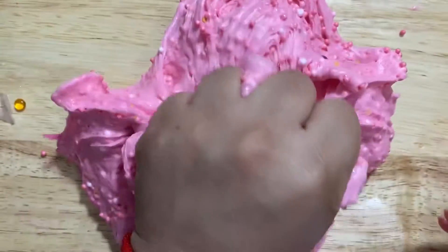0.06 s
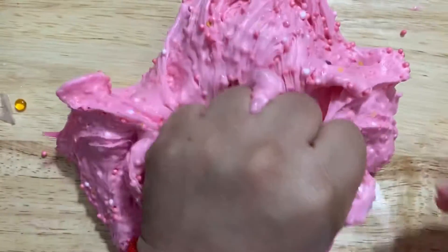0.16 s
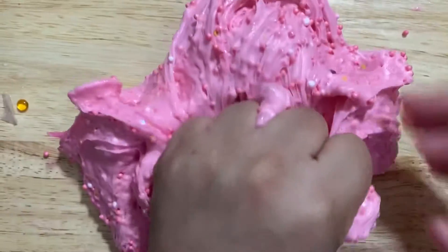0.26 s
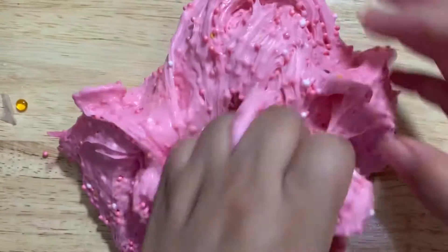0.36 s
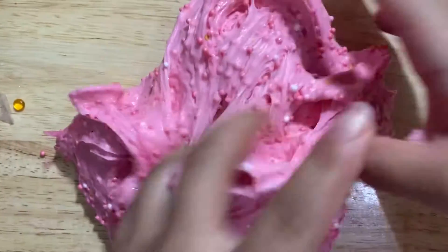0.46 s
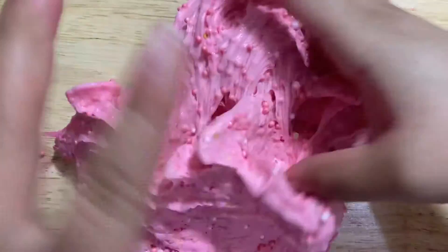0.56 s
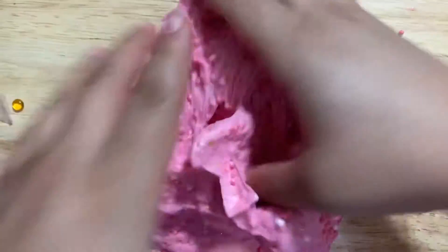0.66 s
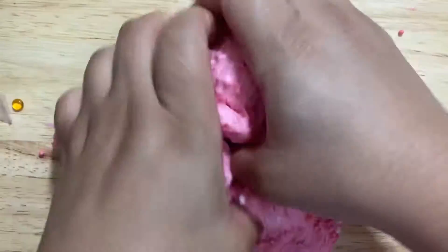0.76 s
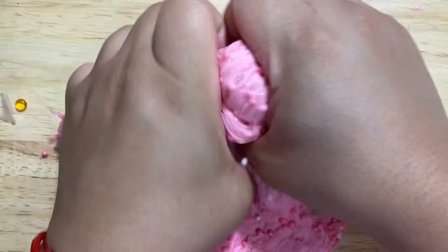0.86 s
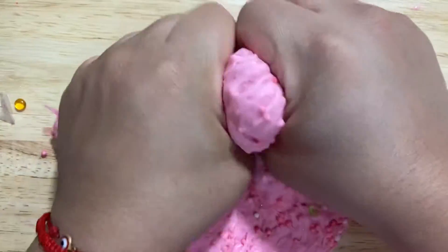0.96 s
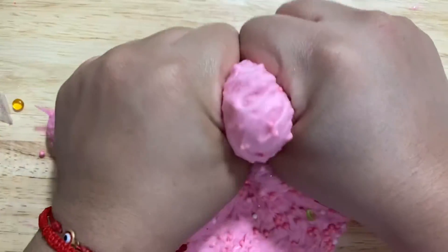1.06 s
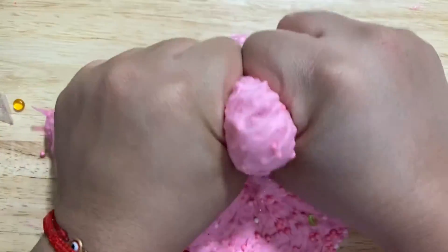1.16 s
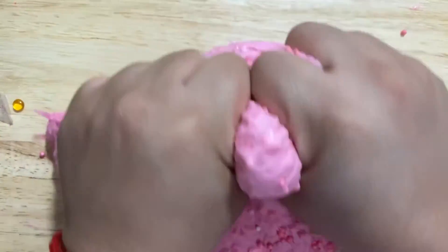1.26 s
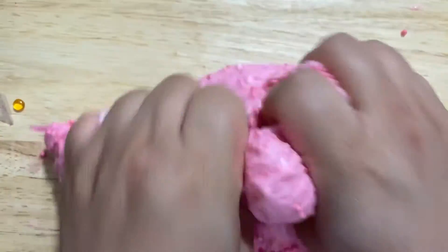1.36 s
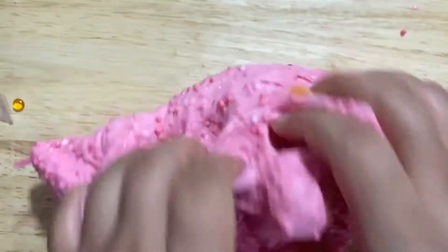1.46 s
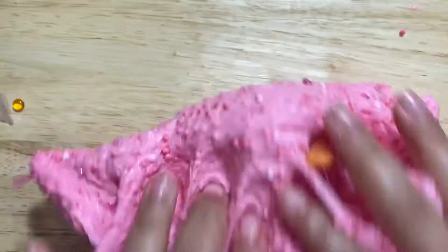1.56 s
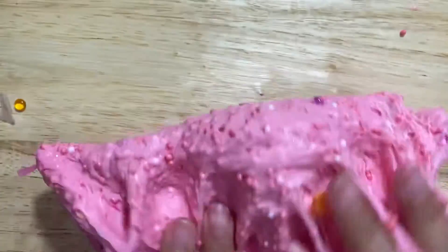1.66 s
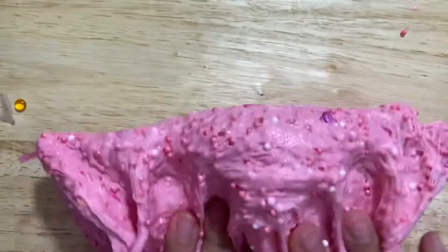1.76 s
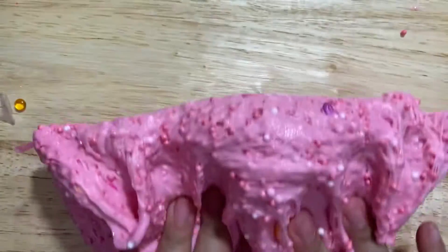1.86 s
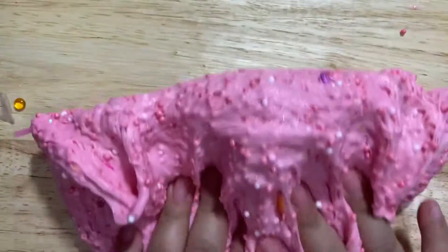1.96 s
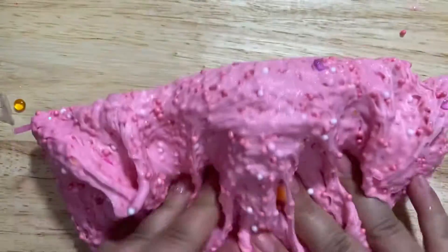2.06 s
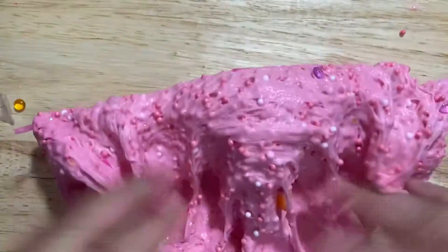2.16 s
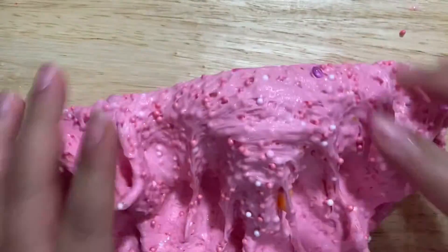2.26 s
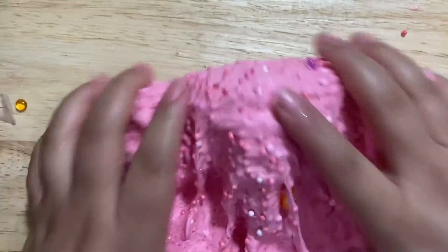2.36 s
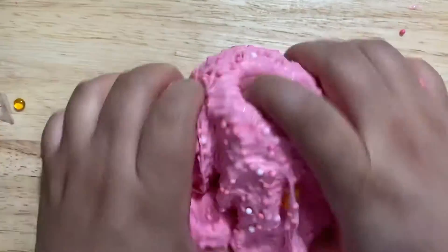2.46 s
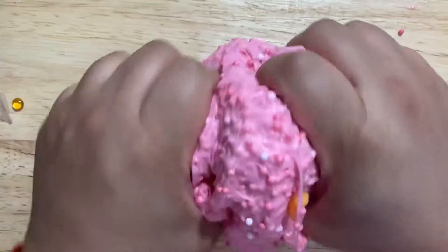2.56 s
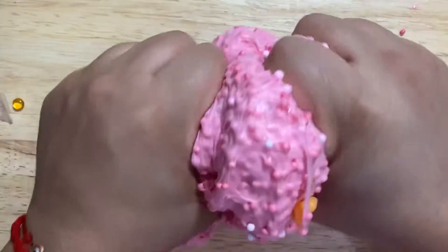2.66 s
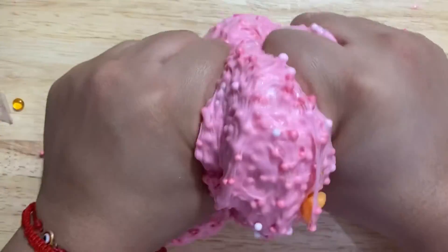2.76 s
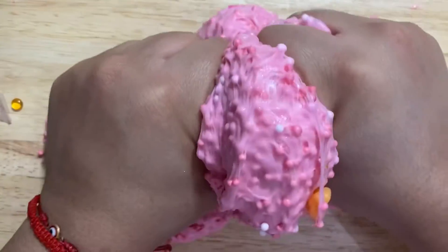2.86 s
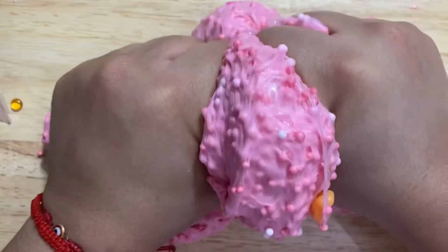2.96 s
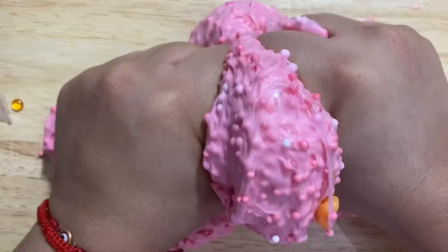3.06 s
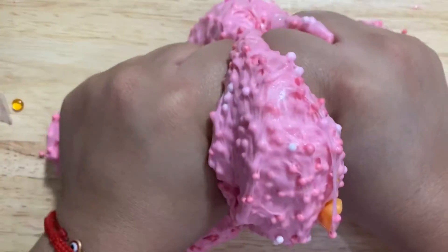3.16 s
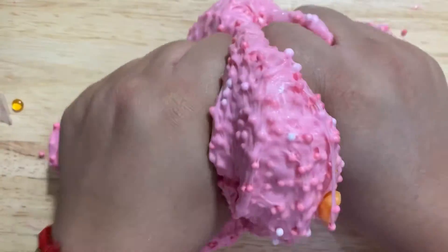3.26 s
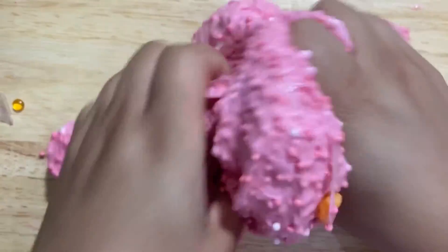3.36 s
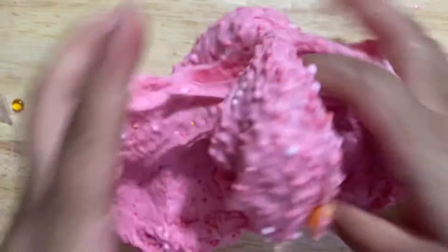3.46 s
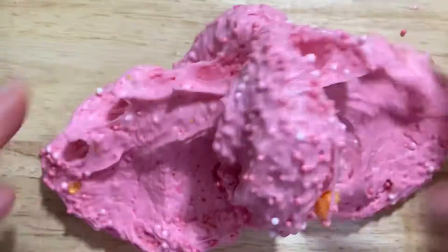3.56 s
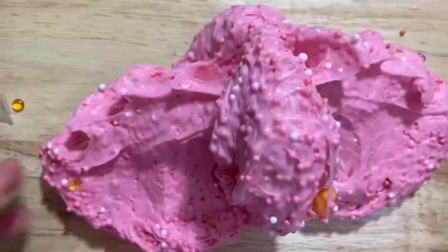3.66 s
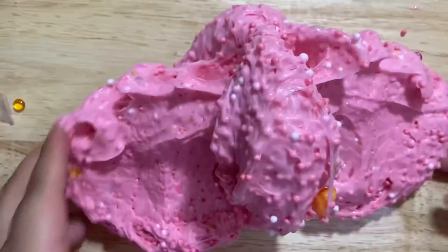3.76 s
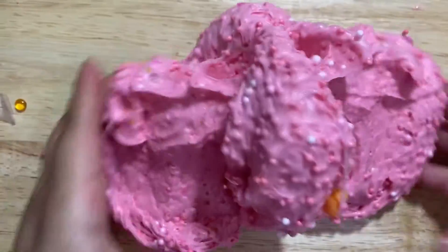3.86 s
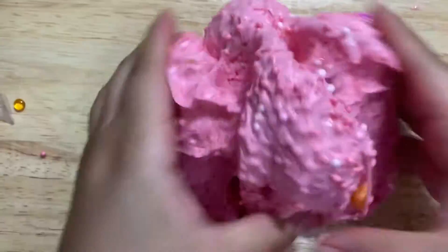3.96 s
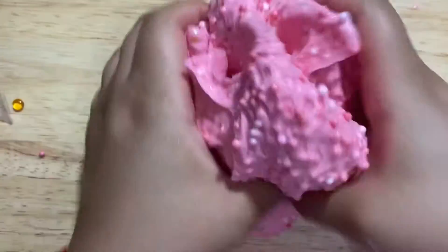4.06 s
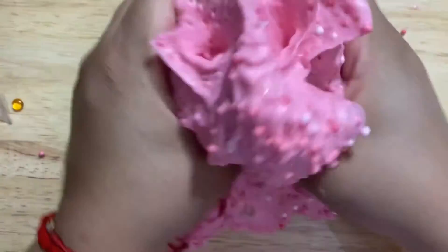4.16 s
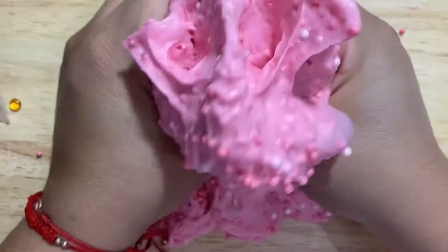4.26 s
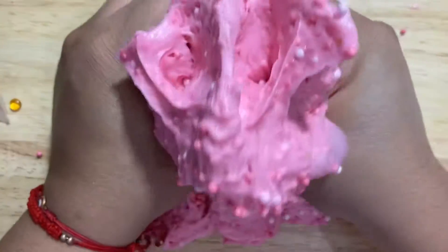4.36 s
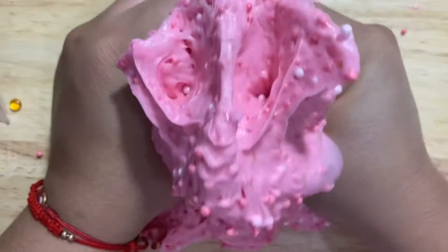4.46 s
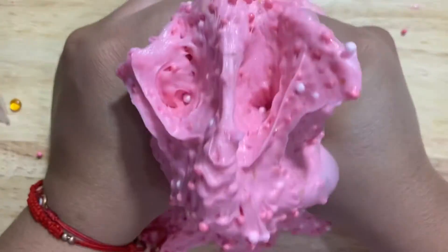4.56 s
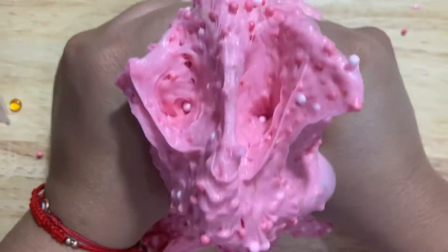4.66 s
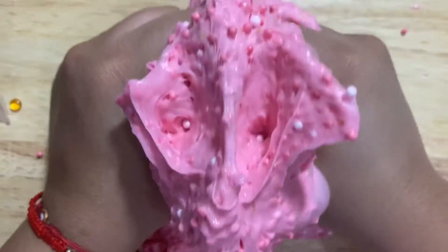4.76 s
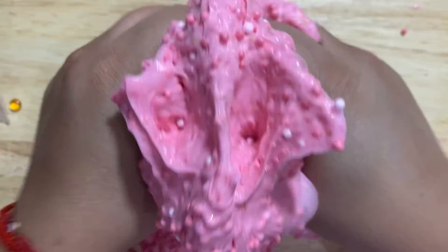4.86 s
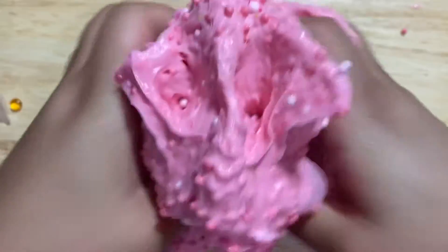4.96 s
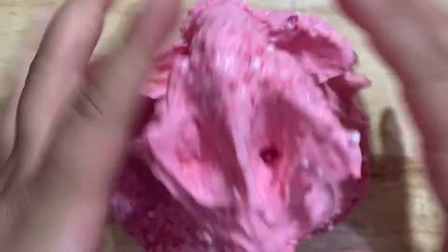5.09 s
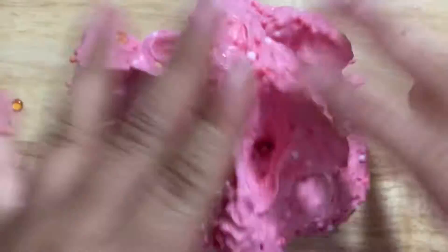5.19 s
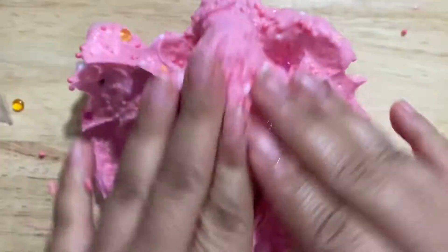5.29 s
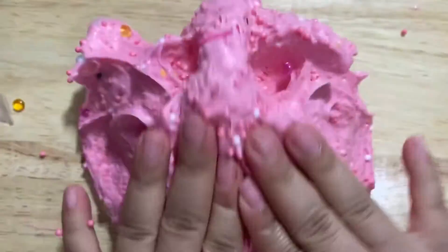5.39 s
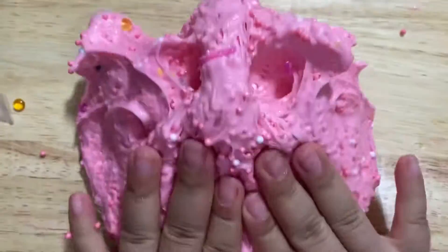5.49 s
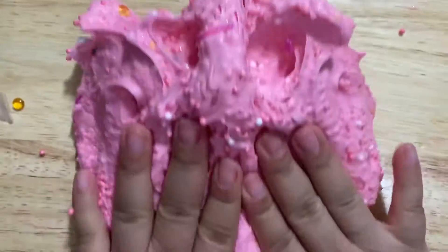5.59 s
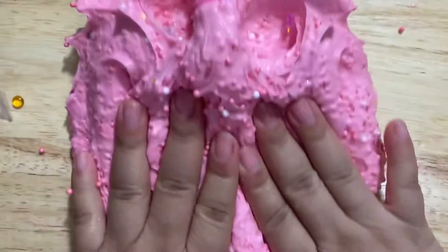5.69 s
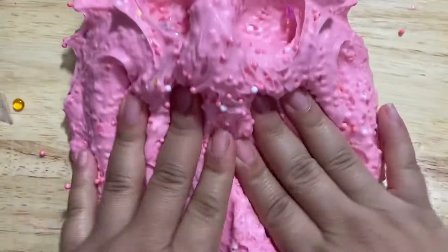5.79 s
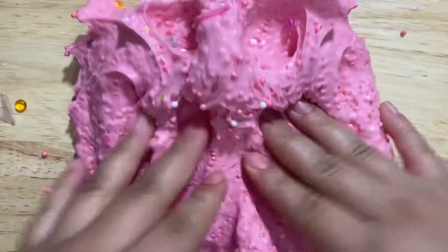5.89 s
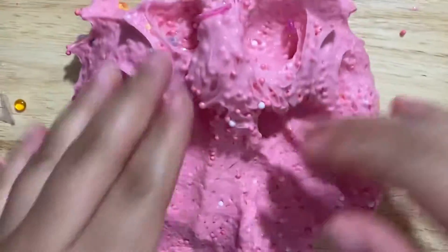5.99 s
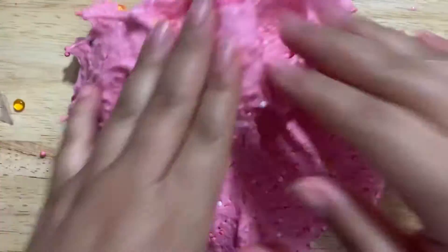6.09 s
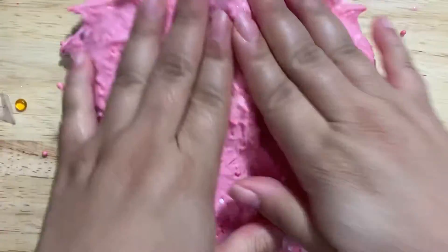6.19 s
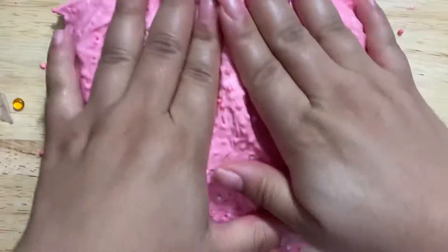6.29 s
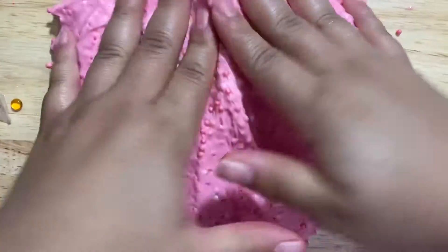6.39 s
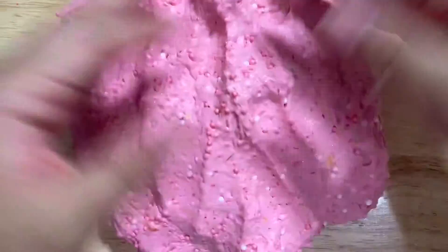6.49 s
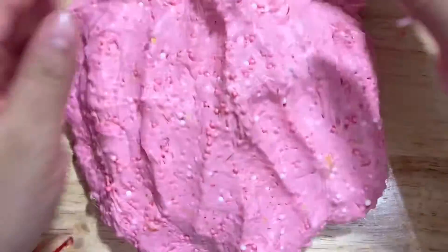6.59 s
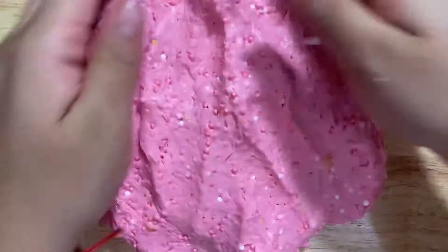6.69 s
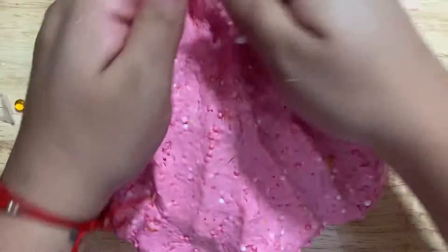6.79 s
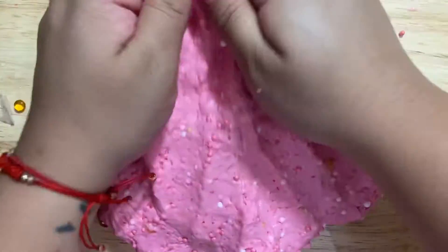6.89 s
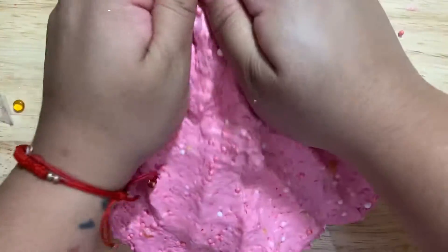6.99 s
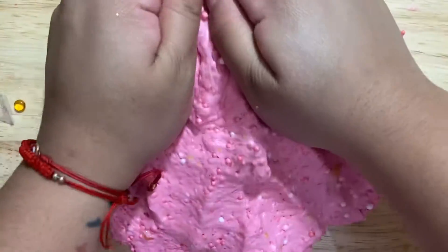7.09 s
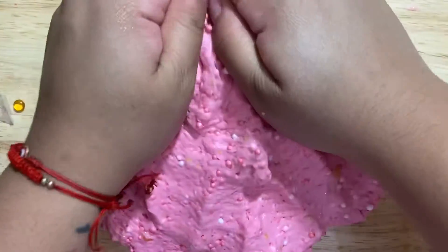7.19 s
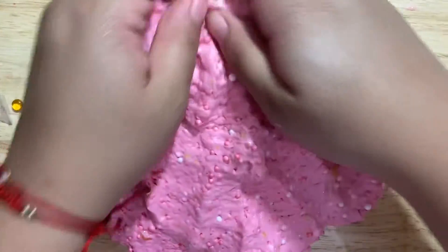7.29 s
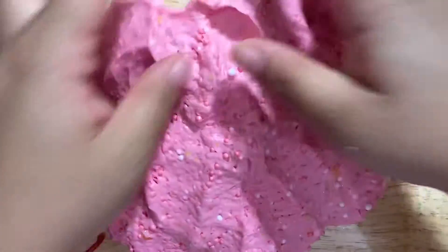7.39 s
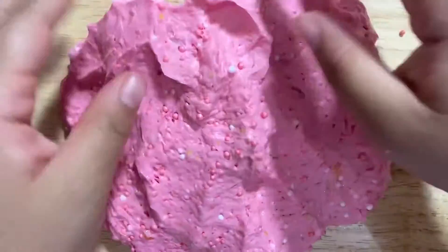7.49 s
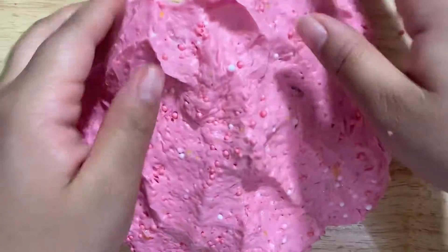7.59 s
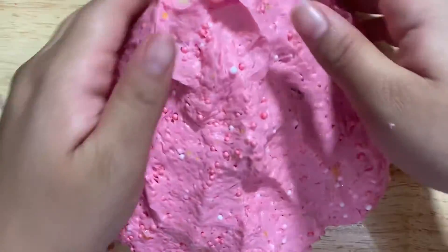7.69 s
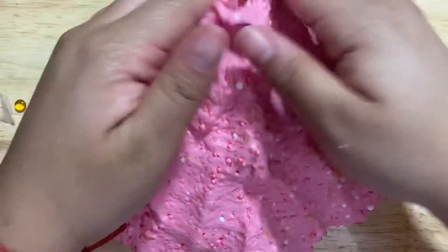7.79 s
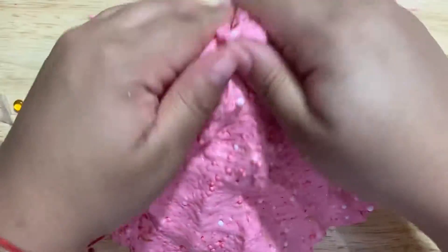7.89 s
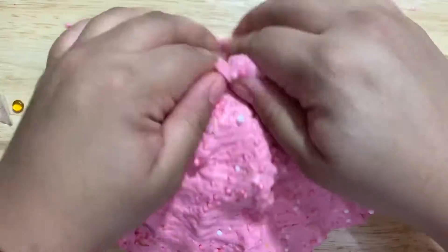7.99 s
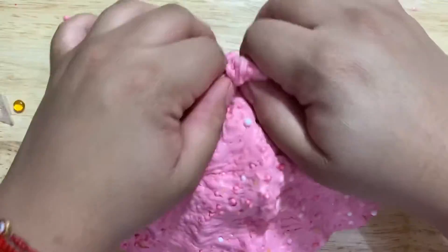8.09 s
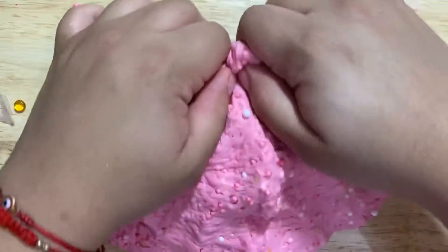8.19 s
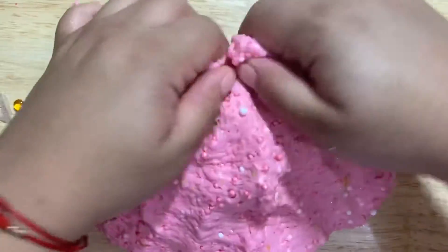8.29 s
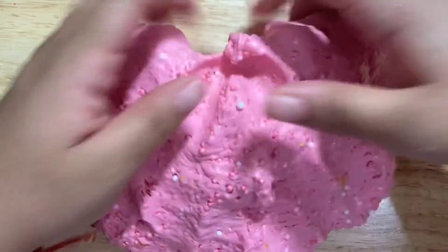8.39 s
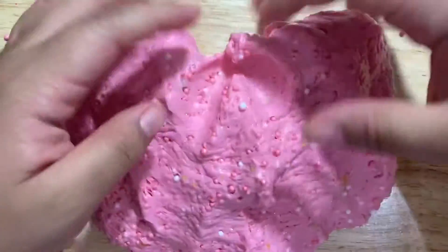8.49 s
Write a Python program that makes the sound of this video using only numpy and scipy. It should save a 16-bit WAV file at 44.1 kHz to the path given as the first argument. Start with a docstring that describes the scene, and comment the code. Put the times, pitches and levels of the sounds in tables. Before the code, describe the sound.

Sticky slime is squeezed, folded and pressed near the microphone in a quiet room. Bright crackling and low gurgling squelches burst out together, followed by crisp popping air pockets, dense around one, three and four seconds. Dull wooden knocks accompany the heavier presses. Later strokes are shorter and drier, with scattered small pops. A weak, unsteady low hum lies underneath, along with barely audible hiss.

```python
"""At a wooden table top, close to a pair of microphone ports, hands knead thick beaded slime.
A low tone of two sines, stronger during strokes and knocks, lies over coloured rumble and white hiss.
Knocks of palms and slime excite decaying board modes; noise keeps the main mode trembling.
Squeezed folds squelch as clumped low ringing grains and short swelling tones; sticky film crackles
as brighter grains over noise; bursting air pops as a snap, a spit and a ringing pocket."""
import sys
import numpy as np
from scipy import signal
from scipy.fft import rfft, irfft, next_fast_len
from scipy.io import wavfile

SR = 44100
rng = np.random.default_rng(int(sys.argv[2]) if len(sys.argv) > 2 else 0)


def file_out(sig):
    """Save sig as 16-bit WAV at sys.argv[1]."""
    # one column per channel
    cols = np.atleast_2d(sig).T
    # limit, then scale
    lim = np.clip(cols, -1, 1)
    pcm = np.round(lim * 32767).astype(np.int16)
    wavfile.write(sys.argv[1], SR, pcm)


N = 376613


def amp(db):
    """Logarithmic level: the gain of a level in dB."""
    return 10 ** (np.asarray(db) / 20)


def rms_one(x):
    """Power normalisation: scaled to rms 1."""
    return x / np.sqrt(np.mean(x ** 2) + 1e-20)


def peak_one(x):
    """Peak normalisation: each row scaled to peak 1."""
    return x / np.abs(x).max(axis=-1, keepdims=True)


def along(points, hz):
    """Logarithmic frequency scale: a table of (frequency [Hz], value) interpolated on it."""
    at, value = np.transpose(points)
    return np.interp(np.log(hz + 1), np.log(at + 1), value)


def colour(x, spectrum):
    """Minimum-phase filtering: a folded cepstrum gives the spectrum without sound before a click."""
    hz = np.fft.rfftfreq(2048, 1 / SR)
    cepstrum = irfft(np.log(amp(along(spectrum, hz))))
    cepstrum[1:1024] *= 2
    cepstrum[1025:] = 0
    impulse_response = irfft(np.exp(rfft(cepstrum)))
    return signal.oaconvolve(x, impulse_response[None])[:, :N]


def drift(rate_hz):
    """Low-passed noise: a slow random fluctuation of rms 1."""
    r = np.exp(-2 * np.pi * rate_hz / SR)
    slow = signal.lfilter([1], [1, -2 * r, r * r], rng.standard_normal(N + SR))
    return rms_one(slow[SR:])  # the first second lets the filter settle


def ring(x, hz, t60):
    """Damped resonance: a unit click starts a sine of height 1 that falls 60 dB in t60 seconds."""
    r, w = amp(-60 / (t60 * SR)), 2 * np.pi * hz / SR
    return signal.lfilter([0, np.sin(w)], [1, -2 * r * np.cos(w), r * r], x + 1e-18)


def grains(per_s, spread_db, clump_db, low_hz, high_hz, cycles):
    """Clustered shot noise: random clicks ring a few cycles; row 1 deals other pitches; rms 1."""
    excess = np.minimum(rng.exponential(1, N), 4)
    sizes = amp(spread_db * excess) * rng.choice([-1, 1], (2, N))
    born = rng.random(N) < per_s / SR * amp(clump_db * drift(25))
    dealt = rng.integers(0, 10, (2, N))
    total = 0
    for k, hz in enumerate(np.geomspace(low_hz, high_hz, 10)):
        clicks = sizes * born * (dealt == k)
        total = total + ring(clicks, hz, cycles / hz) * np.sqrt(hz)
    return rms_one(total)


def hiss():
    """White noise: equal power at all frequencies, independent at the two ports."""
    return amp(-99) * rng.standard_normal((2, N))


# spectral shape of the rumble: (frequency [Hz], relative level [dB per Hz])
RUMBLE_SPECTRUM = [(25, -7.5), (45, 2), (90, 4), (200, -30), (500, -49)]


def rumble():
    """Coloured noise: a faint, steady random signal with its power in the bass."""
    return amp(-68) * rms_one(colour(rng.standard_normal((2, N)), RUMBLE_SPECTRUM))


# low tone and octave: (frequency [Hz], relative level [dB])
TONE_PARTIALS = [(59.3, -1), (118.6, -25)]
# strength of the low tone: (time [s], level [dB])
TONE_LEVEL = [(0.0, -69.5), (0.28, -59), (1.19, -68), (1.24, -82), (1.31, -56), (1.85, -71), (1.99, -54),
              (2.04, -61.5), (3.92, -56), (6.23, -63.5), (6.28, -58), (7.23, -63.5), (7.35, -56),
              (7.56, -68), (7.63, -60.5), (8.28, -66), (8.37, -56), (8.54, -69)]


def low_tone():
    """Harmonic addition: a low tone and its octave share a slightly unsteady time base."""
    t = np.arange(N) / SR
    level_db = np.interp(t, *np.transpose(TONE_LEVEL))
    unsteady_t = t + 0.00028 * drift(3.9)
    tone = sum(amp(db) * np.sin(2 * np.pi * hz * unsteady_t) for hz, db in TONE_PARTIALS)
    return amp(level_db) * np.sqrt(2) * tone


# blows of palms and slime: (time [s], blow level [dB], then relative levels of the
# lowest mode below 100 Hz [dB], middle modes 250-1000 Hz [dB], top modes from 1000 Hz [dB])
KNOCKS = [(0.29, -37, -5, -7, -9), (0.47, -44, -10, -12, -25), (1.318, -41.5, 5.5, 8, -15),
          (1.399, -38, -6, -9, -6), (1.961, -36.5, 4.5, 0, -14.5), (2.349, -30.5, -21, -0.5, -1),
          (3.314, -29, -19, 5, -10), (3.365, -30, -16, 3.5, -9), (3.696, -37.5, -4, -3, -7.5),
          (4.844, -40, -12, -11, -7), (5.583, -43, -5, -12, -28), (5.792, -38, -27, 0, -23),
          (6.265, -45, -8, -12, -25), (6.42, -43, -9, -6, -15), (7.305, -38.5, -12, -4, -11),
          (7.43, -48.5, -10, -15, -25), (7.607, -30, -11, -7.5, -10), (8.339, -37.5, -12, -9, -3),
          (8.41, -39, -12, -2, -13)]
# modes of the table top: (frequency [Hz], relative level [dB], decay time t60 [s])
BOARD_MODES = [(75, 3, .12), (124, 3, .24), (172, -8, .1), (230, -5, .06), (320, -5, .05), (570, -4, .07),
               (856, -10, .05), (1130, -14, .06), (1725, -12, .2), (1780, -17, .12)]
BENDING_SPREAD = .07  # delay [s] times the root of frequency [Hz]


def table(shake_db):
    """Modal superposition with dispersion: blows excite every mode, slow bass bending waves last."""
    s, blow_db, lowest_db, middle_db, top_db = np.transpose(KNOCKS)
    knocks = 0
    for hz, mode_db, t60 in BOARD_MODES:
        # place and softness of the blow
        if hz < 100:
            reach_db = lowest_db
        elif hz < 250:
            reach_db = 0
        elif hz < 1000:
            reach_db = middle_db
        else:
            reach_db = top_db
        arrival = s + BENDING_SPREAD / np.sqrt(hz)
        clicks = np.zeros(N)
        chance_db = rng.normal(0, 1, len(s))
        clicks[np.round(arrival * SR).astype(int)] = amp(blow_db + mode_db + reach_db + chance_db)
        swell = np.exp(-hz * 6 / SR)  # the mode builds up over part of a cycle
        soft_blows = signal.lfilter([1 - swell], [1, -swell], clicks)
        knocks = knocks + ring(soft_blows, hz, t60)
    # kneading keeps the main mode trembling
    main_hz, tremble_t60 = BOARD_MODES[1][0], .16
    push = rng.standard_normal(N)
    steady = np.std(ring(push, main_hz, tremble_t60))
    return knocks + ring(amp(shake_db) * push, main_hz, tremble_t60) / steady


# strokes of the hands: (start [s], crest [s], let-go [s], crackle at crest [dB], squelch at crest [dB],
# crackle climb to the crest [dB], crackle sag [dB/s], release [dB/s], relative share of small pops)
STROKES = [(-.1, 0, 0.11, -53.5, -64, 10, 23, 200, .5), (0.265, 0.287, 0.51, -46.5, -51.5, 19, 24, 500, .1),
           (.58, 0.824, 1.138, -44.5, -51.5, 22, 42, 250, 3.0),
           (1.23, 1.326, 1.483, -43.5, -41.5, 28, 71, 197, .1),
           (1.464, 1.521, 1.71, -53, -56, 17, 46, 100, .6),
           (1.773, 1.819, 1.917, -53, -56, 13, 59, 150, .5),
           (1.988, 2.091, 2.187, -45.5, -47, 13.5, 101, 200, .1),
           (2.292, 2.4, 2.578, -48, -49.5, 13, -8, 200, 1.5),
           (2.581, 2.654, 2.89, -50.5, -59.5, 32, 24, 120, 2.5),
           (3.236, 3.323, 3.502, -39, -37.5, 18, 52.5, 221, .05),
           (3.702, 3.713, 3.74, -64.5, -55.5, 6, 18, 96, .1),
           (3.751, 3.88, 4.49, -49.5, -56, 12.5, 16.5, 127, 3.0),
           (4.796, 4.853, 5.094, -45, -47, 17.5, 28.5, 305, .1),
           (5.195, 5.4, 5.41, -55.5, -59, 13.5, 12.5, 150, 1.2),
           (5.456, 5.47, 5.6, -52.5, -52, 4.5, 83, 150, .6),
           (5.659, 5.726, 5.78, -58, -56, 10, 10, 200, .4),
           (5.761, 5.857, 5.94, -44.5, -45.5, 10, 25, 367, .2),
           (6.113, 6.14, 6.36, -55, -58, 13.5, 2, 202, 1.2),
           (6.351, 6.438, 6.55, -45.5, -46.5, 17.5, 118, 400, .05),
           (6.63, 6.895, 7.08, -51.5, -58.5, 11, 9, 218, 2.5),
           (7.185, 7.288, 7.45, -42, -44, 25, 80, 502, .05), (7.609, 7.733, 7.82, -61, -71, 9, 55, 98, .5),
           (7.936, 7.985, 8.2, -53, -58.5, 14, 72, 82, .8),
           (8.265, 8.326, 8.43, -46, -51, 19, 42, 323, .05)]
ONSET_DB_PER_S, REST_DB = 504, -83  # edge at the start; level between strokes
LINGER_DB, LINGER_DB_PER_S = -15.5, 113  # faint settling after let-go
SQUELCH_SWING = 1.67  # the squelch climbs and sags this many times more than the crackle


def kneading():
    """Power addition of envelopes: strokes climb, sag and release, giving crackle and squelch in dB."""
    t = np.arange(0, N + 64, 64) / SR
    power = amp(REST_DB) ** 2
    for start, crest, end, crackle_db, squelch_db, climb_db, sag, release, _ in STROKES:
        to_crest = np.clip((crest - t) / max(crest - start, 1e-3), 0, 1)
        past_crest = np.clip(t - crest, 0, max(end - crest, 0))
        shape_db = -climb_db * to_crest - sag * past_crest
        after = np.clip(t - end, 0, None)
        onset_db = -ONSET_DB_PER_S * np.clip(start - t, 0, None)
        release_db = np.maximum(-release * after, LINGER_DB - LINGER_DB_PER_S * after)
        edges_db = onset_db + release_db
        levels_db = [crackle_db + shape_db + edges_db,
                     squelch_db + SQUELCH_SWING * shape_db + edges_db]
        power = power + amp(levels_db) ** 2
    return [np.interp(np.arange(N) / SR, t, db) for db in 10 * np.log10(power)]


def small_pops(crackle_db, count=180):
    """Random event process: further pockets burst during strokes; peaks follow the crackle level."""
    start, _, end, *_, share = np.transpose(STROKES)
    draw = rng.random((count, 4))
    chance_db = 5 * rng.standard_normal((count, 3))
    cumulative_share = np.cumsum(np.abs(share)) / np.abs(share).sum()
    stroke = np.searchsorted(cumulative_share, draw[:, 0] * .999)
    s = np.clip(start[stroke] + draw[:, 1] * (end - start)[stroke], 0, None)
    over_crackle_db = chance_db + [7.5, 9.5, -5.5]  # snap, spit, pocket
    snap_db, spit_db, pocket_db = crackle_db[(s * SR).astype(int)] + over_crackle_db.T
    snap_hz, pocket_hz = 1500 * 5 ** draw[:, 2], 400 * 4 ** draw[:, 3]
    return list(zip(s, snap_db, snap_hz, spit_db, pocket_db, pocket_hz))


# spectral shape of the squelch: (frequency [Hz], relative level [dB per Hz])
SQUELCH_SPECTRUM = [(120, -15), (200, -2.5), (300, -3.5), (450, -2.5), (700, -3), (1100, -4.5), (1800, -34)]
# the largest folds gulping air: (time of the crest [s], peak level [dB], pitch [Hz])
GULPS = [(0.2898, -42, 543), (.303, -43, 265), (.4542, -46.5, 490), (.9832, -47, 325), (1.327, -28.5, 454),
         (1.3418, -34.5, 430), (2.075, -36, 331), (2.0932, -41, 398), (2.118, -35.5, 344),
         (2.1383, -38.5, 400), (3.314, -23, 400), (3.368, -26, 483), (3.333, -36, 300), (3.3838, -38, 326),
         (3.399, -34, 357), (3.4574, -43, 600), (4.1944, -35, 500), (4.8491, -41, 366), (4.8723, -39, 490),
         (5.793, -36, 560), (5.807, -34, 503.5), (5.8638, -43, 387), (5.916, -47, 420), (6.4249, -44, 296),
         (6.461, -43, 626), (7.2831, -44, 615), (8.341, -45, 396), (8.4, -44.5, 280)]


def squelch(level_db):
    """Resonance of wet folds: low blips ring; the largest gulps swell and fade within a few cycles."""
    blips = grains(1100, spread_db=3.5, clump_db=4.5, low_hz=168.7, high_hz=1235, cycles=10.8)
    out = amp(level_db) * rms_one(colour(blips, SQUELCH_SPECTRUM))
    t = np.arange(-600, 600) / SR
    for s, peak_db, hz in GULPS:
        swell = np.exp(-(t * hz / np.where(t < 0, .9, 1.4)) ** 2)  # rises faster than it fades
        tone = np.cos(2 * np.pi * hz * t - [[0], [np.pi / 2]])
        i = round(s * SR)
        out[:, i - 600:i + 600] += amp(peak_db) * swell * tone
    return out


# spectral shape of the crackle: (frequency [Hz], relative level [dB per Hz])
CRACKLE_SPECTRUM = [(400, -20), (800, -8), (1500, -2), (3000, -3), (6000, -3.5), (10000, -5), (16000, -5)]


def crackle(level_db):
    """Superposed impulses: film snaps and small bubbles ring over a fizz of countless smaller ones."""
    snaps = grains(700, spread_db=3.5, clump_db=7, low_hz=900, high_hz=16000, cycles=0.95)
    bubbles = grains(700, spread_db=4.5, clump_db=4.5, low_hz=700, high_hz=9440, cycles=24.0)
    fizz = amp(3.0 * drift(45)) * rng.standard_normal((2, N))
    mix = amp(-1.0) * snaps + amp(-6.0) * bubbles + fizz
    return amp(level_db) * rms_one(colour(mix, CRACKLE_SPECTRUM))


# individually placed bursting air pockets, loud and faint: (time [s], snap peak [dB],
# snap centre [Hz], spit peak [dB], pocket peak [dB], starting pocket pitch [Hz])
PLACED_POPS = [(.0303, -36, 4500, -54, -39, 1610), (0.0543, -14, 7200, -12.5, -67, 1520),
               (0.108, -35, 3700, -33, -56, 640), (.1128, -49, 7490, -31.5, -55, 700),
               (0.364, -46, 7490, -32, -49, 610), (.4142, -39, 3520, -32, -60, 330),
               (.665, -31, 5700, -51, -44.5, 480), (0.7261, -35, 2240, -30, -41, 856),
               (0.7445, -28, 2710, -31, -34.5, 980), (.758, -43, 7490, -31, -39, 940),
               (.7786, -32, 3090, -36, -53, 1500), (.815, -17.5, 7300, -18, -17.5, 900),
               (.8861, -37, 2280, -47, -34, 1060), (0.9365, -25, 2450, -29, -36.5, 630),
               (0.9628, -24, 7490, -49, -51, 680), (0.9945, -39, 5900, -34, -56, 800),
               (1.029, -32, 6600, -56, -68, 680), (1.129, -43.5, 5600, -30, -42, 577),
               (1.4299, -49, 7490, -29.5, -64, 330), (1.5774, -64, 7490, -33, -48, 600),
               (1.641, -42, 2730, -40.5, -51, 1250), (1.6782, -39, 7600, -40, -48.5, 950),
               (1.8854, -30.5, 2080, -56, -33.5, 457), (2.1934, -35.5, 3550, -53, -65, 540),
               (2.3514, -33, 1560, -52, -26.5, 490), (2.4091, -29.5, 6800, -48, -40, 450),
               (2.444, -50, 7490, -25.5, -41, 970), (2.4934, -30, 2180, -33, -50.5, 670),
               (2.534, -38, 1510, -27.5, -55, 756), (2.5823, -34, 7490, -29, -51, 328),
               (2.588, -37, 7490, -34, -40, 1000), (2.6658, -52, 7400, -28, -59, 660),
               (2.676, -26.5, 3400, -19.5, -40, 820), (2.7026, -22.5, 3300, -23, -49, 1500),
               (2.72, -35, 4680, -32, -56, 1400), (2.752, -18, 5440, -18.5, -54, 1500),
               (2.7612, -27.5, 2750, -27, -54, 1490), (2.7936, -18, 8300, -15.5, -34, 474),
               (2.8045, -39, 5700, -27, -52, 330), (2.859, -28.5, 4270, -47, -49, 1090),
               (2.9091, -37.5, 2800, -53, -65, 1030), (2.996, -51, 6100, -50, -52, 1490),
               (3.081, -61.5, 5032, -61, -76.5, 1500), (3.6211, -43.5, 6300, -49, -66, 330),
               (3.8015, -30.5, 5760, -31, -40, 800), (3.935, -24.5, 3250, -46, -37, 650),
               (3.9831, -52, 7130, -31.5, -63, 330), (3.9942, -32, 3320, -50, -52, 1500),
               (4.0592, -24, 7350, -26, -53, 920), (4.1145, -27.5, 3150, -24.5, -38.5, 490),
               (4.1542, -24, 5560, -22, -37.5, 800), (4.2671, -32, 7490, -21.5, -49, 433),
               (4.2922, -36.5, 2960, -40, -41.5, 546), (4.37, -37, 4800, -53, -68, 330),
               (4.418, -28, 7050, -54, -47, 1040), (4.7197, -73, 1550, -46.5, -69, 334),
               (4.9032, -49, 1520, -28.5, -32, 798), (5.0747, -27, 6130, -28, -63, 1430),
               (5.2382, -36, 7350, -69, -63, 580), (5.3078, -50, 7600, -34, -60, 327),
               (5.3532, -33, 5530, -31, -41, 474), (5.3887, -22.5, 8300, -41, -64, 710),
               (5.4645, -27, 1300, -30, -26, 510), (5.507, -29, 6900, -28.5, -45, 1270),
               (5.689, -52, 7490, -32, -42, 1500), (5.7158, -39, 2900, -48, -38, 1280),
               (6.1499, -29, 7560, -30, -40, 1350), (6.1552, -28.5, 7700, -29, -30.5, 900),
               (6.209, -35, 2350, -46, -63, 1500), (6.242, -36, 1540, -49, -34, 1070),
               (6.2952, -28, 2520, -43, -60, 1500), (6.528, -42.5, 1200, -55, -48, 1000),
               (6.6308, -59, 7490, -39, -66, 550), (6.659, -36.5, 1810, -42, -34.5, 1050),
               (6.7889, -30.5, 2740, -49, -37.5, 1055), (6.8055, -33, 3100, -55, -43, 1500),
               (6.8393, -37, 7490, -34, -45, 1180), (6.9082, -39, 3240, -55, -37.5, 1510),
               (6.968, -35, 7490, -29.5, -44, 1133), (6.9928, -42, 2090, -57, -33.5, 1510),
               (7.0437, -29, 4020, -29.5, -40, 940), (7.0672, -30.5, 5570, -42, -53, 895),
               (7.0881, -37.5, 2760, -53, -36.5, 1030), (7.2721, -26, 7290, -13, -48, 328),
               (7.693, -47, 2300, -59, -64, 1200), (7.769, -42.5, 2520, -46, -55, 1000),
               (7.926, -39.5, 7700, -36.5, -58, 353), (7.9876, -28, 3380, -26, -47, 790),
               (8.0532, -34.5, 7200, -60, -53, 1150), (8.169, -41, 5930, -77, -78, 1540)]


def pops(crackle_db):
    """Impulsive excitation: a burst snaps and spits; the emptying pocket rings, sagging in pitch."""
    rows = PLACED_POPS + small_pops(crackle_db)
    out = np.zeros((2, N + 1000))
    t = np.arange(1000) / SR
    noise = rng.standard_normal((len(rows), 2, 1000))
    bright = signal.butter(2, [7000, 14800], "band", fs=SR)
    tail = np.exp(-t / .0004) + amp(-15) * np.exp(-t / .0025)
    envelope = np.minimum(t / .0001, 1) * tail
    for (s, snap_db, snap_hz, spit_db, pocket_db, pocket_hz), burst in zip(rows, noise):
        ragged = burst * envelope
        own_pitch = peak_one(ring(ragged, snap_hz, 8.3 / snap_hz))
        broad_crack = peak_one(ring(ragged, 4700, 0.0043))
        snap = peak_one(own_pitch + 0.37 * broad_crack)
        spit = peak_one(signal.lfilter(*bright, ragged))
        phase = 2 * np.pi * pocket_hz * t * (1 - 15 * t) + [[0], [np.pi / 2]]
        pocket = peak_one(np.sin(phase) * np.exp(-t * pocket_hz / 0.82))
        i = round(s * SR)
        out[:, i:i + 1000] += amp(snap_db) * snap + amp(spit_db) * spit + amp(pocket_db) * pocket
    return out[:, :N]


# phase lead of the left port over the right: (frequency [Hz], lead [rad])
LEFT_LEAD = [(0, 0), (900, -.6), (6000, -.8), (7300, .3), (8500, 3.1), (11000, 6.2), (13500, 9.4),
             (16000, 12.4)]
# likeness of the two ports: (frequency [Hz], coherence [0-1])
LIKENESS = [(60, .97), (300, .95), (800, .85), (1300, .6), (3000, .6), (7000, .65), (8500, .98),
            (10000, .8), (13500, .98), (15000, .8)]
# level of the left port over the right: (frequency [Hz], level difference [dB])
LEFT_OVER_RIGHT = [(60, 4.5), (180, -1.5), (550, -2), (1650, -2.5), (4970, -3.5), (15000, 1)]


def ports(x):
    """Partial coherence: direct sound (row 0) plus or minus scatter off hands and table (row 1)."""
    size = next_fast_len(N + 4000)
    hz = np.fft.rfftfreq(size, 1 / SR)
    direct, scattered = rfft(x, size)
    alike = np.clip(along(LIKENESS, hz), 0, 1)
    mid = np.sqrt((1 + alike) / 2) * direct
    side = np.sqrt((1 - alike) / 2) * scattered
    # the body shifts the phase; each port takes half of every difference
    half_lead = .5j * np.interp(hz, *np.transpose(LEFT_LEAD))
    turn = amp(along(LEFT_OVER_RIGHT, hz) / 2) * np.exp(half_lead)
    return irfft(np.array([(mid + side) * turn, (mid - side) / turn]), size)[:, :N]


def scene():
    """Linear superposition: all sources reach both ports; board and low tone scatter nothing."""
    crackle_db, squelch_db = kneading()
    # the tremble follows 0.6 of the squelch swing with a 41 ms lag: -65 dB at a squelch of -60 dB
    r = np.exp(-1 / (0.041 * SR))
    shake_db = -65 + .6 * signal.lfilter([1 - r], [1, -r], squelch_db + 60)
    solid = (table(shake_db) + low_tone()) * [[1], [0]]
    slime = squelch(squelch_db) + crackle(crackle_db) + pops(crackle_db)
    return ports(rumble() + solid + slime) + hiss()


def record(dry):
    """Band limiting: the deep bass falls away below 44 Hz and the top is cut by 60 dB at 17 kHz."""
    high_pass = signal.butter(6, 44, "high", fs=SR, output="sos")
    low_pass = signal.cheby2(12, 60, 17000, fs=SR, output="sos")
    return signal.sosfilt(low_pass, signal.sosfilt(high_pass, dry))


dry = scene()
out = record(dry)
file_out(out)
```